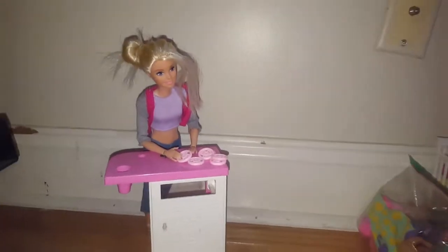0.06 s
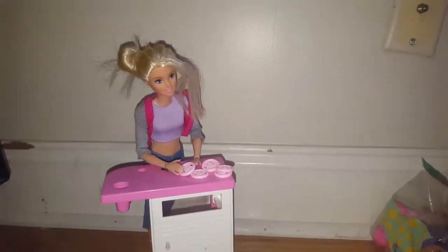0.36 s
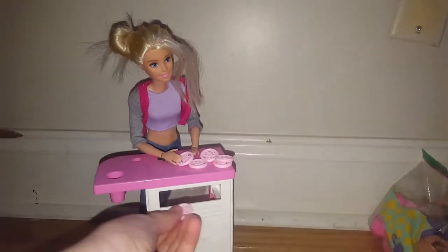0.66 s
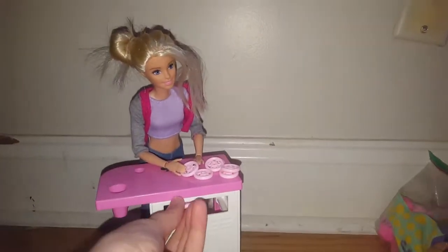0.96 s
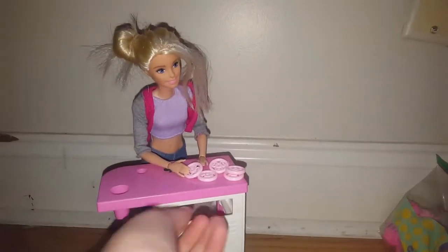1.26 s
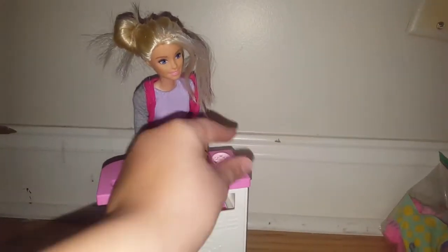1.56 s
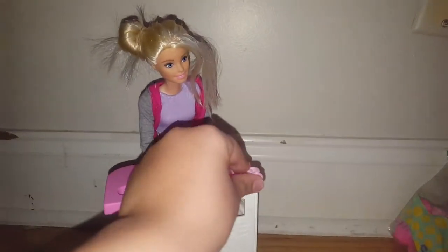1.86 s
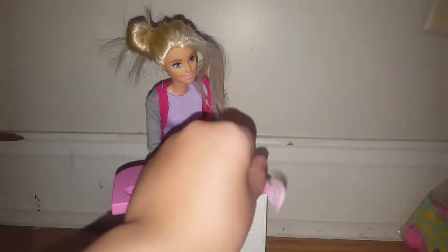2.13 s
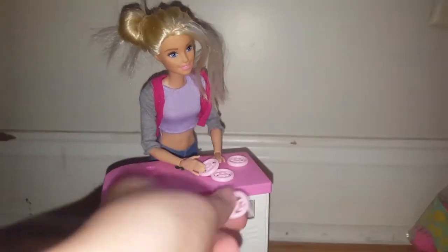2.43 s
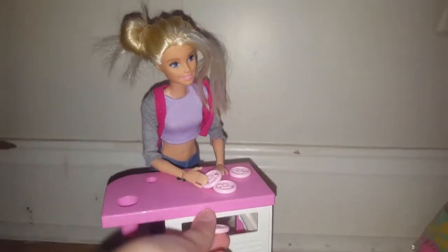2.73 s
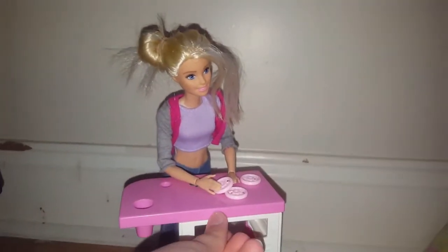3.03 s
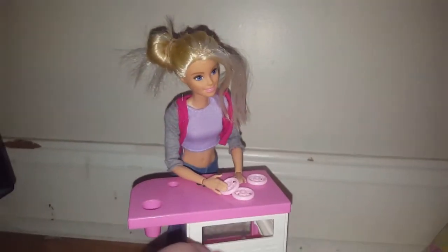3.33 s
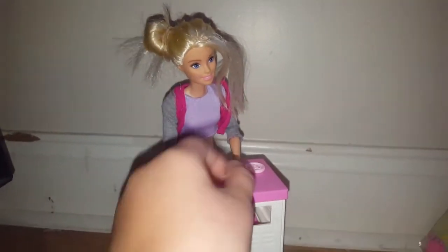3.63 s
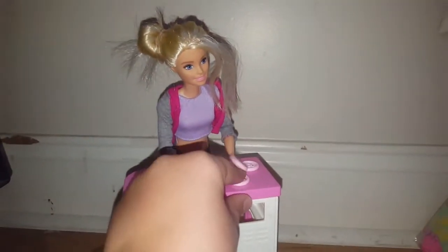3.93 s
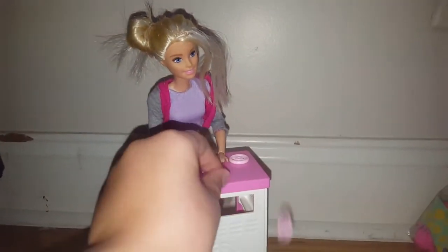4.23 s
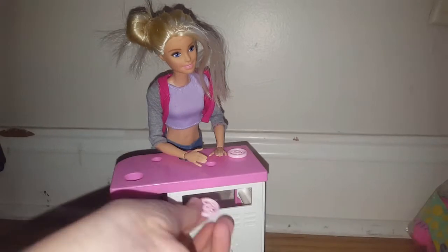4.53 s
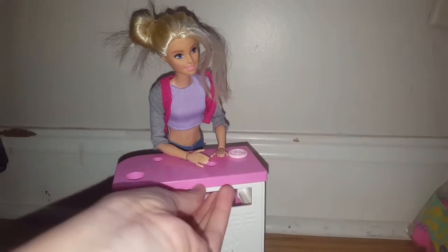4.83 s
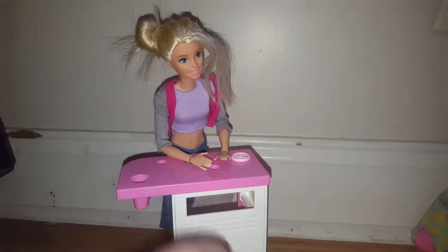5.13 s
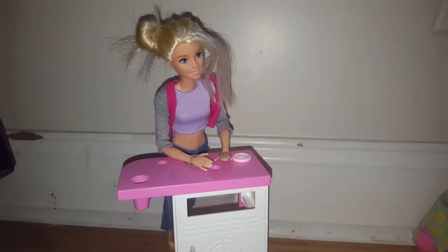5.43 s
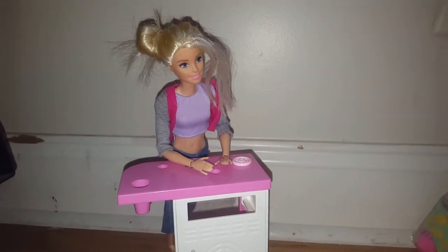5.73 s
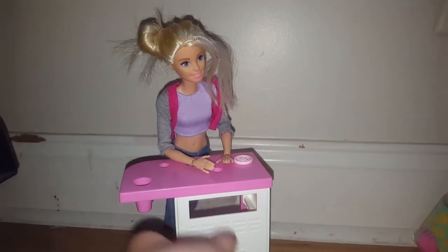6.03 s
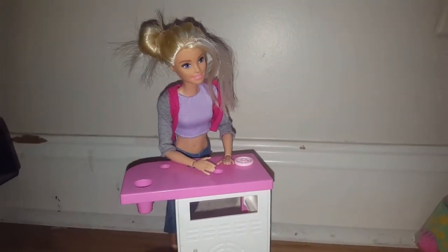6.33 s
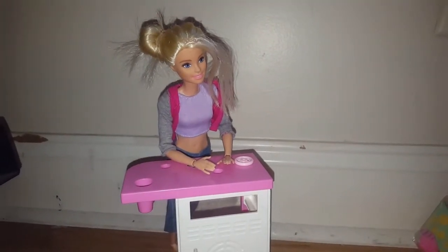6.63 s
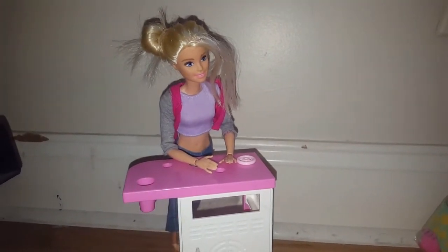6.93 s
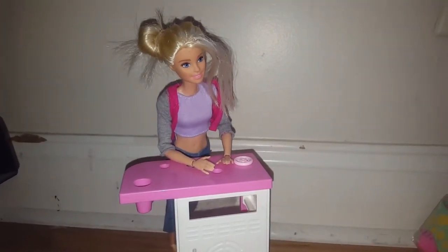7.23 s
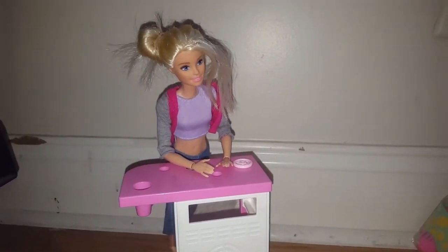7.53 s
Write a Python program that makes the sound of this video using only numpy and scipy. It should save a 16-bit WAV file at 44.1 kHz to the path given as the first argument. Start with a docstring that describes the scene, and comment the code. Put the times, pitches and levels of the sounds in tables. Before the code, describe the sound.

Dull thumps shake a nearby microphone, then a plastic toy coin drops through the slot of a hollow toy counter with a sharp knock and a short rattle. More coins tick together and hiss softly across the top while an arm rustles. Another coin rattles down inside, followed by a few scattered clicks. A small room adds a brief echo over a faint electrical hum and thin whine.

```python
"""Small plastic coins click on each other and on a hollow toy counter as a hand picks them up and drops
them through its slot to clatter down inside. Each hit is a snap, a short crack and the ring of the
thing struck; sliding coins hiss. The counter thuds under some hard clicks, dull bumps shake a camera
on the wooden floor, and an arm rustles beside it. A small hard room answers every click, over a faint
mains hum and whine."""
import sys
import numpy as np
from scipy import signal
from scipy.fft import rfft, irfft
from scipy.io import wavfile
from scipy.ndimage import uniform_filter1d

SR = 44100
rng = np.random.default_rng(int(sys.argv[2]) if len(sys.argv) > 2 else 0)


def transcribe(u):
    """Save the signal u as a 16-bit wav file named by the first command-line argument.

    u: samples, shape (n,) or (channels, n), limited to [-1, 1]; the rate is SR.
    q: integer samples, one column per channel.
    """
    v = np.clip(np.atleast_2d(u).T, -1, 1)
    q = np.round(v * 32767).astype(np.int16)
    wavfile.write(sys.argv[1], SR, q)


N = 343274

# coin clicks: t/s, level/dB, brightness/(dB per octave), face clack/dB, crack t60/s, relative flop/dB
COIN_CLICKS = [(0.9936, -39.5, -2, 3, 0.034, -27), (1.1824, -41.5, 0.5, 4, 0.0096, -29),
               (1.873, -49, -2, -4, 0.019, -8), (2.0094, -36, 2, -0.5, 0.016, -20),
               (2.22, -49.5, -2.5, 0, 0.039, -20), (2.2764, -32, 3.5, 3.5, 0.083, -4),
               (2.315, -39, 2, 8, 0.14, -16), (2.4376, -43.5, -1, -7, 0.044, -14),
               (2.5086, -37, 0.1, -4, 0.15, -20), (2.6259, -27, 3, 2, 0.055, -26),
               (2.6583, -32, 1.5, 2, 0.031, -20), (2.7863, -31.5, 2.4, 2.5, 0.068, -16),
               (2.8846, -26.5, 2, 10, 0.013, -25), (2.9029, -36, -1.7, 3, 0.021, -20),
               (2.9168, -36.5, 0, -16, 0.059, -16), (2.9661, -37, -1, 0, 0.027, -13),
               (2.9951, -42.5, -1.5, 4.5, 0.02, -17), (3.0242, -38, 3, -16, 0.0055, -21.5),
               (3.0505, -39.5, 4.5, 4, 0.019, -16), (3.1104, -42.5, 1, -4.5, 0.061, -20),
               (3.1564, -45.5, -1, -5, .072, -20), (3.2014, -48, -2, 0, 0.06, -20),
               (3.229, -22.5, 0.8, -0.5, 0.023, -25), (3.2932, -27.5, -1, -0.5, 0.026, -20),
               (3.4746, -50.5, -5, -4, 0.023, -9), (3.4995, -29, 3.5, 2, 0.047, -5.5),
               (3.654, -44, -0.5, 0, 0.18, -20), (3.7575, -49.5, -0.5, 1.5, 0.17, -20),
               (3.845, -46.5, -.5, -0.5, 0.27, -20), (3.951, -42, -1, 3, 0.12, -20),
               (3.961, -51, 2.5, 15.5, 0.029, -2), (4.0261, -45.5, 4, 2, 0.05, -20),
               (4.0698, -59.5, -3, 15, 0.096, -20), (4.0851, -45, -1, 1, 0.051, -25),
               (4.165, -40, -0.5, -1, 0.16, -22), (4.1997, -30.5, 3, -1, 0.021, -11),
               (4.216, -34.5, 3, -3, 0.11, -9), (4.2402, -33.5, 4, 0.5, 0.022, -3),
               (4.2788, -37.5, 2.5, -7, 0.097, -6), (4.4866, -51, -4, 10.5, 0.14, -22),
               (4.5063, -44, 7, -3, 0.096, -17), (4.6957, -46, 2.5, 6.5, 0.22, -10),
               (4.768, -48.5, -3, 2, .028, -20), (4.8017, -43.5, 4.5, 6.5, 0.032, -18),
               (5.4127, -42.5, -0.8, -0.5, 0.17, -22), (5.5175, -49, 3, 3, 0.062, -20),
               (5.567, -50.5, 2.5, 4.5, 0.066, -22), (5.6078, -49, 3.5, 3.5, 0.083, -20),
               (6.3761, -30.5, 2.5, 0.5, 0.046, -5.5), (6.5508, -44.5, 5.3, 5, 0.082, -3),
               (6.6487, -41.5, -0.5, 2, 0.055, -20), (6.6778, -44, 7, 7, .025, -20),
               (6.709, -45.5, 5.5, 5, .057, -20), (7.138, -52.5, 1, 1.5, .028, -23),
               (7.2188, -52, 6.5, 7, .042, -20)]
# ring of a coin: f/Hz, level/dB, t60/s
COIN_MODES = [(1440, -17, .04), (1820, -10, .035), (1980, -10, .035), (3580, -12, .025), (4050, -11, .02),
              (4400, -12, .02), (4900, -12, .02), (9400, -11, .055), (14000, -4.5, .05)]
def coin_clicks(flop_s=.0075, pan_db=-9, ticks=2, tick_db=-2.5, tick_t60=.059):
    """A coin lands rim first, then flops flat; pushed coins also tick together during each slide."""
    eq_db = [-8, -1.5, -.5, -3]
    hits = []
    for s, db, brightness, clack_db, t60, flop_db in COIN_CLICKS:
        hits.append(contact(eq_db, s, db, brightness, t60, pan_db, clack_db))
        hits.append(contact(eq_db, s + flop_s, db + flop_db, brightness, t60, pan_db, clack_db))
    places = (np.arange(ticks) + rng.random((len(SLIDES), ticks))) / ticks
    accents_db = tick_db + rng.standard_normal(places.shape)
    for (start, length, db), where, how_hard in zip(SLIDES, places, accents_db):
        for place, accent_db in zip(where, how_hard):
            hits.append(contact(eq_db, start + place * length, db + accent_db, 0, tick_t60, pan_db))
    return strike(hits, COIN_MODES, width=1, snap_db=-5, scatter_db=5,
                  ring_db=-4.5, gain_db=.5, detune=.015)


# knocks on the top: t/s, level/dB, brightness/(dB per octave), crack t60/s, pan left/dB
TOP_KNOCKS = [(1.1984, -26.5, 1.7, 0.023, -7), (1.249, -26.5, 2, .064, -2), (1.2601, -16, 3, 0.021, -13),
              (2.5283, -37.5, -1.4, 0.047, -4), (3.035, -34.5, -1.5, 0.077, -9),
              (5.0167, -28, 0.1, 0.023, -1.5), (5.0666, -27, 0.2, 0.1, -7)]
# ring of the top: f/Hz, level/dB, t60/s
TOP_MODES = [(689, -8, .21), (1110, -13, .06), (1416, -20, .1), (1750, -14, .18), (2988, -23, .18),
             (3900, -11, .025), (4312, -15, .03), (5200, -12, .025)]
def counter_knocks():
    """Coins knock on the hollow counter top and set it ringing."""
    eq_db = [-2, -1.5, -3, -10.5]
    hits = [contact(eq_db, *knock) for knock in TOP_KNOCKS]
    return strike(hits, TOP_MODES, width=.74, snap_db=-1, scatter_db=0,
                  ring_db=-4, gain_db=-1.5, detune=.0085)


# bounces inside the counter: t/s, level/dB, brightness/(dB per octave), crack t60/s, pan left/dB
BOUNCES = [(1.2747, -35, -2.5, 0.14, 1), (1.3183, -27, 0.9, 0.035, -8), (1.4312, -32.5, 0.1, 0.02, -6),
           (1.4675, -37, 0, .068, -9), (1.4809, -42.5, -1.5, 0.036, -5), (5.12, -21.5, 2.3, 0.039, -5.5),
           (5.1415, -28.5, 0, 0.015, -5), (5.1561, -30, 2.5, .1, -3), (5.1691, -33, 1.5, 0.099, -9),
           (5.1824, -31.5, 0.5, 0.031, -6), (5.2154, -41, -1.5, .076, -5), (5.2516, -41.5, -1, 0.17, -9),
           (5.2886, -36.5, .4, .06, -6)]
# ring of the inside: f/Hz, level/dB, t60/s
INSIDE_MODES = [(1110, -12, .09), (1240, -14, .06), (1480, -16, .06), (1740, -15, .07), (2040, -19, .08),
                (3270, -18, .04), (3490, -10, .07), (4670, -9, .075), (5100, -13, .035), (7440, -19, .04),
                (10650, -18, .025)]
def coin_drops(rebound_s=.016, rebound_db=-8.5):
    """Coins tumble down inside; each bounce is followed by a weaker hit on another wall."""
    eq_db = [-3, .5, 0, -3.5]
    delays = rebound_s * (.5 + rng.random(len(BOUNCES)))
    hits = []
    for (s, db, brightness, t60, pan_db), delay in zip(BOUNCES, delays):
        hits.append(contact(eq_db, s, db, brightness, t60, pan_db))
        hits.append(contact(eq_db, s + delay, db + rebound_db, brightness, t60, pan_db))
    return strike(hits, INSIDE_MODES, width=.7, snap_db=5, scatter_db=2.5,
                  ring_db=-3, gain_db=1.5, detune=.0066)


# the four bands of a hit: low f/Hz, high f/Hz, pan multiplier
HIT_BANDS = [(500, 1300, .15), (1300, 2600, .45), (2600, 6000, 1.3), (6000, 15500, 1.1)]
def contact(eq_db, s, db, brightness, t60, pan_db, clack_db=0):
    """One hit's band levels: a harder contact is brighter, and a coin's face clacks in the second band."""
    octaves = np.log2([np.sqrt(low * high) for low, high, _ in HIT_BANDS])
    tilt_db = brightness * (octaves - octaves[2])
    bands_db = db + np.array(eq_db) + tilt_db + [0, clack_db, 0, 0]
    return s, bands_db, pan_db, t60


def strike(hits, modes, width, snap_db, scatter_db, ring_db, gain_db, detune):
    """Each hit is a sharp snap, a noisy crack of dense modes and the clear ring of the thing struck."""
    t = np.arange(SR // 3) / SR
    attack = t < .009
    hz, mode_db, mode_t60 = np.transpose(modes)[:, :, None]
    filters = [signal.butter(3, band[:2], "band", fs=SR, output="sos") for band in HIT_BANDS]
    out = np.zeros((2, N))
    for s, bands_db, pan_db, t60 in hits:
        centre, *sides = rng.standard_normal((3, len(t)))
        crack = (centre + width * np.array(sides)) / np.hypot(1, width)
        crack *= amp(-60 * t / t60) + amp(snap_db - 60 * t / .00095)
        # the point of contact decides how hard each mode is driven
        drive_db = ring_db + mode_db + scatter_db * rng.standard_normal(hz.shape)
        decay = amp(drive_db - 60 * t / mode_t60)
        detuned_hz = hz * (1 + detune * rng.standard_normal(hz.shape))
        phase = 2 * np.pi * (detuned_hz * t + rng.random(hz.shape))
        stereo_phase = phase + width * rng.standard_normal((2, *hz.shape))
        body = crack + (decay * np.sin(stereo_phase)).sum(1)
        for sos, db, (_, _, pan_scale) in zip(filters, bands_db, HIT_BANDS):
            band = signal.sosfilt(sos, body)
            band /= np.sqrt(np.mean(band[:, attack] ** 2, axis=1, keepdims=True))
            add(out, s, band * amp(db + gain_db) * unit(pan(pan_db * pan_scale)))
    out[0] = np.roll(out[0], 3)  # the sound reaches the left a little later
    return out


# overall EQ of the hits: f/Hz, gain/dB
HIT_EQ = [(100, 44), (500, -5), (900, 0.5), (1700, 0.5), (2600, -4), (3600, 2.5), (4800, 4.5), (6200, -4),
          (8000, -1.5), (11500, -5), (14200, -10)]
def hit_tone(hits):
    """One overall EQ shapes all the clicks, knocks and bounces."""
    return coloured(hits, HIT_EQ)


# sliding strokes: t/s, length/s, level/dB
SLIDES = [(0.191, 0.073, -59.5), (0.326, .14, -62), (.51, 0.13, -61.5), (1.864, 0.088, -56.5),
          (2.147, 0.072, -55), (2.438, 0.069, -52), (3.001, .15, -50), (3.573, 0.66, -55.5),
          (4, 0.14, -60.5), (4.18, .13, -46), (4.498, .07, -47), (4.714, 0.14, -55), (5.299, 0.17, -57.5),
          (5.552, .13, -56.5), (6.546, .06, -52), (6.661, 0.095, -48.5), (6.85, 0.27, -62),
          (7.489, 0.044, -64)]
# EQ of the friction: f/Hz, gain/dB
SLIDE_EQ = [(300, -30), (900, -16), (1700, 5.5), (2800, -3), (4600, 2), (7000, -12), (8700, -10),
            (9400, -2), (10200, -49), (14000, -3), (16000, -41)]
def coin_slides(catches_per_s=500, catch_db=14, catch_decay_s=.0021):
    """Skin and coins slide over plastic: a fine friction hiss with tiny catches in it."""
    catches = (rng.random(N) < catches_per_s / SR) * rng.exponential(1, N)
    grain = signal.lfilter([1], [1, -np.exp(-1 / (catch_decay_s * SR))], catches)
    hiss = unit(air(SLIDE_EQ) * (1 + amp(catch_db) * grain))
    return hiss * gestures(SLIDES, attack_s=.021, release_s=.033, rest_db=-71) * pan(-3)


# dull bumps on floor and camera, and low thuds of the counter under hard clicks:
# t/s, level/dB, f/Hz, relative rattle/dB, pan left/dB
BUMPS = [(0.513, -34.5, 246, -7.5, 10), (.643, -16.5, 380, -10.5, -4), (.656, -17.5, 347, -12, 15),
         (0.666, -8.5, 316, -5.5, 2), (0.673, -22, 156, -27, -3), (0.684, -19, 435, 1, -10),
         (.728, -13, 423, -9, -5.5), (.774, -21.5, 430, -2.5, -2), (1.002, -36.5, 276, 3.5, 3),
         (1.102, -35, 380, -4, 9), (1.39, -39.5, 220, 5, 23), (1.5, -32, 223, -4, 22),
         (2.121, -44, 64, -28, -2), (2.19, -40.5, 290, -7, 7), (2.26, -40.5, 322, 1, -1),
         (2.782, -39.5, 300, -14, 8), (3.391, -24, 186, -4, 0), (3.502, -34, 320, -14, 2),
         (3.95, -35.5, 157, -1, 6), (5.155, -29.5, 188, -12, 2), (5.509, -33.5, 161, -10, 2),
         (5.612, -34, 158, -7, -1), (6.377, -40, 335, -6, 2), (6.743, -33, 262, -10, 5),
         (6.838, -38, 279, -25, 6), (7.668, -34.5, 150, -7, 0)]
# ring of the camera case: f/Hz, level/dB, t60/s
CASE_MODES = [(463, -10, .08), (620, -9, .04), (800, -12, .05), (899, -14, .1), (1195, -9, .08),
              (1400, -12, .035), (2780, -20, .09), (2934, -24, .14), (4500, -24, .06)]
def bumps(rise_cycles=.69, scuff_hz=900, scuff_db=-9, scuff_t60=.055, width=.79):
    """A soft push swings a few times, with a dull scuff and a rattle of the camera case."""
    t = np.arange(SR // 3) / SR
    case_hz, case_db, case_t60 = np.transpose(CASE_MODES)[:, :, None]
    scuff_pole = np.exp(-2 * np.pi * scuff_hz / SR)
    out = np.zeros((2, N))
    for s, db, hz, rattle_db, pan_db in BUMPS:
        rise = hz * t / rise_cycles
        stereo_phase = width * hz / 400 * rng.standard_normal((2, 1))
        push = rise * np.exp(1 - rise) * np.sin(2 * np.pi * hz * t + stereo_phase)
        scuff = unit(signal.lfilter([1], [1, -scuff_pole], rng.standard_normal((2, len(t)))))
        scuff *= amp(scuff_db - 60 * t / scuff_t60)
        cycles = case_hz * t + rng.random((2, len(CASE_MODES), 1))
        ring = (amp(case_db - 60 * t / case_t60) * np.sin(2 * np.pi * cycles)).sum(1)
        rattle = (ring + scuff) * np.minimum(t / .00071, 1)
        add(out, s, amp(db) * (push + amp(rattle_db) * rattle) * unit(pan(pan_db)))
    return out


# arm moves: t/s, length/s, level/dB
ARM_MOVES = [(0, 0.39, -51.5), (.32, 0.13, -42), (.52, 0.16, -48.5), (.64, 0.22, -41), (1.15, 0.56, -55),
             (1.9, 0.18, -52.5), (2.35, 0.63, -51.5), (3.22, 0.39, -50.5), (3.65, 0.45, -53.5),
             (5.47, 0.19, -51.5), (6.55, .27, -60), (7.5, 0.36, -59.5)]
# EQ of the rustle: f/Hz, gain/dB
RUSTLE_EQ = [(35, -30), (65, -7.5), (150, 5.5), (300, -2.5), (480, -4.5), (700, -11), (1200, -16),
             (3000, -19), (8000, -34), (15000, -42)]
def arm_rustle():
    """The arm shifts over the floor in low swells of noise."""
    return air(RUSTLE_EQ) * gestures(ARM_MOVES, attack_s=.034, release_s=.059, rest_db=-64.5) * pan(3)


# reverb decay: f/Hz, t60/s
REVERB_T60 = [(150, 0.13), (500, 0.16), (1400, 0.3), (4000, 0.3), (9000, 0.26), (15000, 0.21)]
# reverb EQ: f/Hz, gain/dB
REVERB_EQ = [(100, 2), (400, 6.5), (900, 5), (1700, 0.5), (3000, 1.5), (4700, -0.5), (7000, -0.5),
             (14000, 1)]
def room_reverb(dry, wet_db=-8, early_db=-9, echoes_per_s=5000, drift_hz=.3):
    """Weak echoes from near things, then a tail from the walls; it shifts as the hand moves about."""
    length = SR // 2
    shape = (3, 2, length)  # three stereo tails
    echoes = rng.standard_normal(shape) * (rng.random(shape) < echoes_per_s / SR)
    hz, frame_s, spectra = signal.stft(echoes, SR, nperseg=256)
    spectra *= amp(read(REVERB_EQ, hz)[:, None] - 60 * frame_s / read(REVERB_T60, hz)[:, None])
    tails = signal.istft(spectra, SR, nperseg=256)[1][..., :length]
    t = np.arange(length) / SR
    tails *= np.interp(t, [.002, .004, .0105, .014], [0, amp(early_db), amp(early_db), 1])
    tails /= np.linalg.norm(tails, axis=-1, keepdims=True)
    # the send crossfades steadily round the three tails
    angle = 2 * np.pi * (drift_hz * np.arange(N) / SR + np.arange(3)[:, None] / 6)
    crossfed = dry + .017 * dry[::-1]
    sends = np.sqrt(2 / 3) * np.cos(angle)[:, None] * crossfed
    return amp(wet_db) * signal.fftconvolve(sends, tails, axes=-1).sum(0)[:, :N]


# EQ of the room noise: f/Hz, gain/dB
ROOM_TONE_EQ = [(20, -31), (45, -9.5), (90, -3.5), (150, -1), (220, -7.5), (380, -12), (520, -9),
                (750, -16.5), (1350, -19.5), (2000, -34), (2550, -21.5), (3600, -32.5), (7000, -35),
                (14500, -40.5)]
# hum and whine partials: f/Hz, level/dB
HUM_PARTIALS = [(119, -58.5), (1362, -68), (2724, -106)]
def room_tone(noise_db=-54.5, waver_depth=.00055):
    """Room noise under a mains hum and a thin whine that waver slightly in pitch."""
    waver = unit(uniform_filter1d(rng.standard_normal(N), size=4000))
    wavering_s = np.cumsum(1 + waver_depth * waver) / SR
    hum = sum(np.sqrt(2) * amp(db) * np.sin(2 * np.pi * hz * wavering_s) for hz, db in HUM_PARTIALS)
    return (amp(noise_db) * air(ROOM_TONE_EQ) + hum) * pan(4.5)


# stereo image of the noise layers: f/Hz, left-right correlation
CORRELATION = [(50, 0.92), (150, 1), (700, 0.067), (2000, 0.04), (10000, 0.063)]
def air(eq):
    """Coloured stereo noise of rms 1, nearly mono in the bass."""
    left, other = rfft(rng.standard_normal((2, N)))
    shared = read(CORRELATION, np.fft.rfftfreq(N, 1 / SR))
    right = shared * left + np.sqrt(1 - shared ** 2) * other
    return unit(coloured(irfft(np.array([left, right]), N), eq))


def gestures(moves, attack_s, release_s, rest_db):
    """Envelope of movements: each builds, holds and dies away to a resting level."""
    t = np.arange(N) / SR
    power = amp(rest_db) ** 2
    for start, length, db in moves:
        attack = np.clip((t - start) / attack_s, 0, 1)
        release = np.exp(-np.clip((t - start - length) / release_s, 0, 20))
        power = power + (amp(db) * attack * release) ** 2
    return np.sqrt(power)


def amp(db):
    """Decibels to gain."""
    return 10 ** (np.asarray(db) / 20)


def pan(db):
    """Stereo gains with the left db above the right."""
    return amp([[db / 2], [-db / 2]])


def unit(x):
    """Scales to rms 1."""
    return x / np.sqrt(np.mean(x ** 2) + 1e-20)


def read(curve, hz):
    """Reads a curve on a log-frequency axis."""
    f, value = np.transpose(curve)
    return np.interp(np.log(hz + 1), np.log(f), value)


def coloured(x, eq):
    """Filters by an EQ curve in dB."""
    return irfft(rfft(x) * amp(read(eq, np.fft.rfftfreq(N, 1 / SR))), N)


def add(mix, s, sound):
    """Mixes a stereo sound in at time s."""
    part = mix[:, max(round(s * SR), 0):][:, :sound.shape[1]]
    part += sound[:, :part.shape[1]]


def scene():
    """Coins and counter in the room; handling comes mostly through solid things and stays a bit drier."""
    toy = hit_tone(coin_clicks() + counter_knocks() + coin_drops()) + coin_slides()
    handling = bumps() + arm_rustle()
    return toy + handling + room_reverb(toy + amp(-1) * handling) + room_tone()


def record(dry):
    """A steep low-pass at 14.8 kHz takes off the top."""
    lowpass = signal.firwin(301, 14800, window=("kaiser", 7), fs=SR)
    return signal.oaconvolve(dry, lowpass[None], "same")


dry = scene()
out = record(dry)
transcribe(out)
```